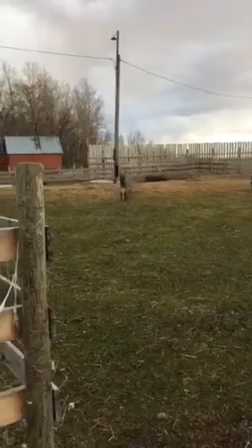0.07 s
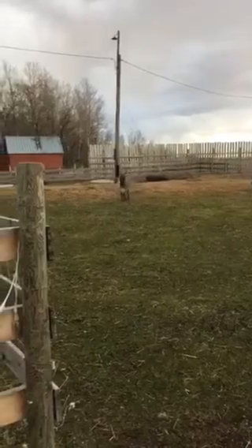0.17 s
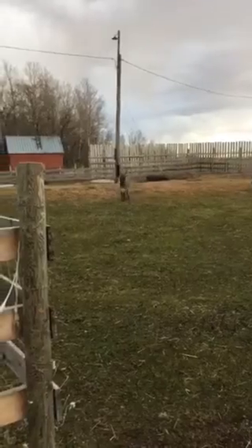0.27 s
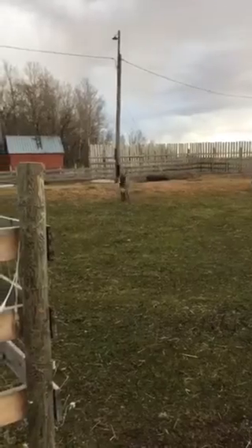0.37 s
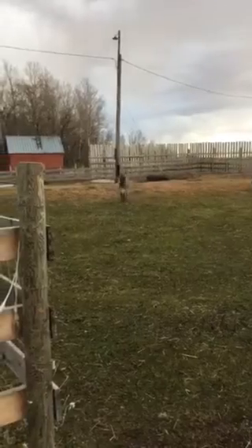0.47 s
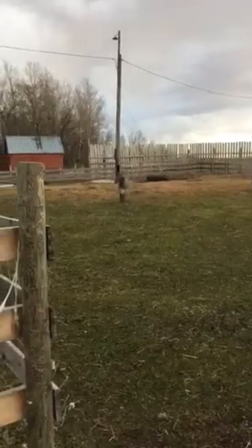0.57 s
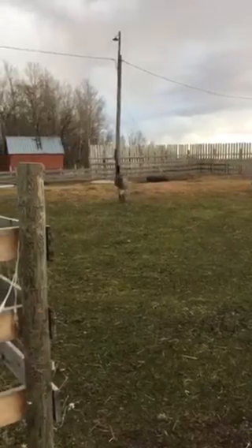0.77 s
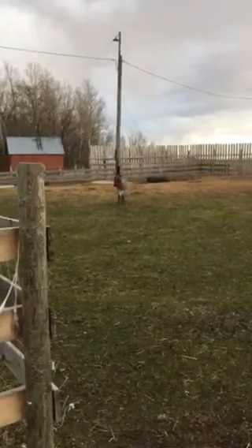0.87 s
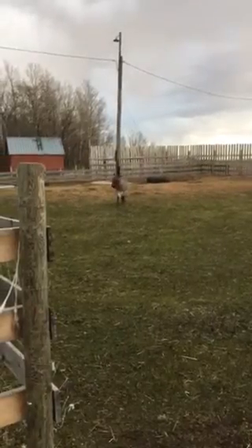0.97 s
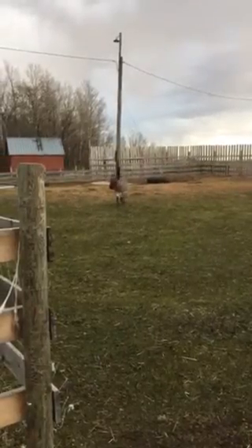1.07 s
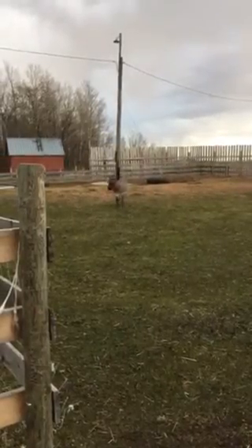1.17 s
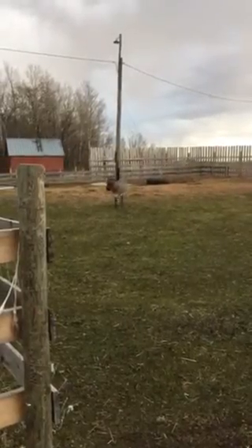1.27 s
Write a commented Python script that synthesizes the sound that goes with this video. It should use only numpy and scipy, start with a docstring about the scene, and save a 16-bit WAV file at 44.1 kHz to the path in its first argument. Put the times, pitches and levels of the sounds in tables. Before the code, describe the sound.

A young donkey brays once across an open pasture. It starts with a soft, closed-mouth hum at 0.1 seconds, breaks into a rough croak at 0.2, then holds a clear, buzzy note from 0.4 to 0.9, growing duller and leaving a faint echo. A bird's soft falling whistle overlaps from 0.5 to 0.9. Very faint, thin chirps recur until about 1.3 seconds over a quiet, distant rumble.

```python
"""A young donkey in a pasture

The donkey brays once: a closed-mouth hum, a jolting croak, then one clear, buzzy held note.
Pulses from its vocal folds ring a throat that dulls as the air runs out; barn and trees echo faintly.
One bird gives a falling whistle, another repeats thin chirps, over a distant rumble and far twitter."""
import sys
import numpy as np
from scipy import signal
from scipy.fft import rfft, irfft
from scipy.io import wavfile
from scipy.ndimage import uniform_filter1d

SR = 44100
rng = np.random.default_rng(int(sys.argv[2]) if len(sys.argv) > 2 else 0)


def put_to_file(sound):
    """Save the sound as 16-bit audio at rate SR, in the file named by the first command-line argument."""
    columns = np.atleast_2d(sound).T  # one column per channel
    safe = np.clip(columns, -1, 1)
    whole_steps = np.round(safe * 32767)
    wavfile.write(sys.argv[1], SR, whole_steps.astype(np.int16))


N = 57330
TIME = np.arange(N) / SR


def gain(db):
    """Turn decibels into a number to multiply by."""
    return 10 ** (np.asarray(db) / 20)


def curve(rows, col=1):
    """One column of a table, joined by straight lines in time."""
    rows = np.array(rows, float)
    return np.interp(TIME, rows[:, 0], rows[:, col])


def unit(x):
    """Scale a sound to an average (rms) strength of 1."""
    return x / np.sqrt(np.mean(x ** 2))


def tone(hz):
    """A pure tone that follows a changing pitch."""
    return np.sin(2 * np.pi * np.cumsum(hz) / SR)


def drift(rate_hz):
    """A smooth random wobble with a typical size near 1."""
    hold = int(SR / rate_hz)
    steps = np.repeat(rng.standard_normal(N // hold + 1), hold)
    return 1.3 * uniform_filter1d(uniform_filter1d(steps, hold), hold)[:N]


def colour(x, points, size=4096):
    """Make each frequency louder or softer, following (f/Hz, level/dB) points."""
    hz, db = np.array(points, float).T
    f = np.maximum(np.arange(size // 2 + 1) * SR / size, 1)
    cepstrum = irfft(np.log(gain(np.interp(np.log(f), np.log(hz), db))))
    # make the filter ring only after a pulse, never before it
    cepstrum[1:size // 2] *= 2
    cepstrum[size // 2 + 1:] = 0
    return signal.fftconvolve(x, irfft(np.exp(rfft(cepstrum))))[:N]


def lowpass(x, hz):
    """Keep what lies below hz, without delaying it."""
    return signal.sosfiltfilt(signal.butter(4, hz, fs=SR, output="sos"), x)


# tone colour of still air: f/Hz, relative level/dB
AIR_COLOUR = [(20, -32.5), (60, 5), (125, -4.5), (300, -19.5), (1700, -22.5), (2900, -26.5), (5000, -31.5),
              (15500, -32)]

def air(level_db=-62):
    """The soft, deep hush of still air."""
    return unit(colour(rng.standard_normal(N), AIR_COLOUR)) * gain(level_db)


# swells of the rumble: t/s, level/dB
RUMBLE_LEVEL = [(.15, -57.5), (.4, -71), (.85, -64), (1.07, -76), (1.28, -54.5)]

def rumble(pitch_hz=60.3, waver_db=4.5):
    """A distant low tone that wavers in pitch and loudness."""
    drone = unit(tone(pitch_hz * (1 + .037 * drift(7.33))))
    return drone * gain(curve(RUMBLE_LEVEL) - waver_db * drift(7.9))


def blurred_band(hz, width_hz=620):
    """A narrow band of noise around hz: birdsong blurred by distance."""
    flutter = lowpass(rng.standard_normal(2 * N), width_hz / 2)[N // 2:N // 2 + N]
    return unit(flutter * np.cos(2 * np.pi * hz * TIME))


def far_birds(call_at_s=1.28, call_width_s=.03):
    """Far-off twitter, with one short, higher call near the end."""
    call = blurred_band(hz=4400) * gain(-70) * np.exp(-((TIME - call_at_s) / call_width_s) ** 2)
    twitter = blurred_band(hz=3270) * gain(-69.5 + 1.2 * drift(25.1))
    return call + twitter


# tone colour of the echo from barn and trees: f/Hz, level/dB
ECHO_COLOUR = [(200, 0), (730, -3), (1700, 8), (2300, 1), (4300, 0), (15000, -12)]
# bounce off the treeline: delay t/s, relative level/dB
TREELINE = [(.21, -8)]

def pasture_echo(calls, chirps, build_s=.0053, fade_60db_s=1):
    """Calls bounce off the treeline and leave a fading wash of echo; thin chirps leave only the wash."""
    envelope = (1 - np.exp(-TIME / build_s)) * gain(-60 * TIME / fade_60db_s)
    tail = unit(rng.standard_normal(N) * envelope) / np.sqrt(N)
    bounce = sum(gain(db) * np.pad(calls, (int(delay * SR), 0))[:N] for delay, db in TREELINE)
    wash = signal.fftconvolve(gain(2) * calls + chirps, tail)[:N]
    return colour(bounce + wash, ECHO_COLOUR)


# one chirp a row: start t/s, top pitch f/Hz, level/dB
CHIRP_NOTES = [(.057, 7850, -77), (.127, 7400, -73), (.78, 7550, -73), (1.0, 7580, -74), (1.11, 7530, -72),
               (1.218, 7480, -70)]

def chirping_bird(length_s=.05, top_s=.037, rise_hz=900, fall_hz=1900):
    """Thin chirps, each rising to a top and hooking down."""
    out = 0
    for start, top_hz, db in CHIRP_NOTES:
        age = np.clip(TIME - start, 0, length_s)
        rising = rise_hz * (1 - age / top_s) ** 3
        falling = fall_hz * ((age - top_s) / (length_s - top_s)) ** 2
        swell = np.sqrt(2 * np.abs(np.sin(np.pi * age / length_s)))
        out = out + gain(db) * swell * tone(top_hz - np.where(age < top_s, rising, falling))
    return out


# path of the whistle: t/s, f/Hz, level/dB
WHISTLE_PATH = [(.485, 6150, -72), (.5, 5900, -59), (.53, 5100, -74), (.575, 4600, -55), (.62, 4400, -60),
                (.66, 4280, -55), (.745, 4130, -54), (.85, 4290, -62), (.885, 4280, -73)]

def whistling_bird(waver=.003):
    """A bird's long, pure whistle that falls and levels out."""
    hz = curve(WHISTLE_PATH) * (1 + waver * drift(149.6))
    sounding = (TIME > WHISTLE_PATH[0][0]) * (TIME < WHISTLE_PATH[-1][0])
    return unit(tone(hz)) * gain(curve(WHISTLE_PATH, 2)) * sounding


# loudness of the hum: t/s, level/dB
HUM_LEVEL = [(.105, -113), (.122, -55.5), (.18, -59.5), (.235, -49), (.26, -75)]

def hum(cycles):
    """With the donkey's mouth shut, only the lowest tone of its voice gets out."""
    sounding = (TIME > HUM_LEVEL[0][0]) * (TIME < HUM_LEVEL[-1][0])
    return unit(np.sin(2 * np.pi * cycles)) * gain(curve(HUM_LEVEL)) * sounding


# jolts of the croak: t/s, added level/dB
CROAK_JOLTS = [(.211, 11), (.229, 13), (.292, 6), (.31, 5), (.333, 7), (.351, 4), (.368, 3)]

def croak(cycles, jolt_s=.009):
    """Each jolt throws the vocal folds open: their cycle restarts with a hard pulse and a weaker one."""
    times = np.array(CROAK_JOLTS)[:, 0]
    # shift the cycle count so that a pulse lands on every jolt
    slip = np.unwrap(-2 * np.pi * np.interp(times, TIME, cycles)) / (2 * np.pi)
    shifted = cycles + np.interp(TIME, times, slip - np.floor(slip[0]))
    boost_db = sum(db * (TIME > at - .001) * np.exp(-((TIME - at) / jolt_s) ** 2)
                   for at, db in CROAK_JOLTS)
    return shifted, gain(boost_db)


# hoarseness of the voice: t/s, roughness/0-1
ROUGHNESS = [(.3, .85), (.378, .58), (.41, .2), (.8, .15), (.86, .32), (.91, .5)]

def vocal_folds(cycles, jitter_s=.00019, shimmer_db=1.5, half_width=8):
    """One sharp pulse a cycle; roughness upsets timing and strength and adds a rasp of air."""
    rough = curve(ROUGHNESS)
    at = np.interp(np.arange(1, int(cycles[-1]) - 1), cycles, np.arange(N))
    pulse_rough = rough[at.astype(int)]
    timing_luck, strength_luck = rng.standard_normal((len(at), 2)).T
    at = np.clip(at + pulse_rough ** 2 * jitter_s * SR * timing_luck, half_width, N - half_width - 2)
    strength = gain(shimmer_db * pulse_rough * strength_luck)
    # draw each pulse as a tiny ripple, so it can fall between two samples
    samples = at.astype(int)[:, None] + np.arange(-half_width, half_width + 1)
    offset = samples - at[:, None]
    shape = np.sinc(offset) * np.cos(np.pi * offset / (2 * half_width + 2)) ** 2
    pulses = np.bincount(samples.ravel(), (shape * strength[:, None]).ravel(), N)
    rasp = rng.standard_normal(N) * np.exp(-(cycles % 1) / .35)  # a puff of air each cycle
    return unit(pulses) + .8 * rough ** 2 * unit(rasp), rough


# ring of the throat with the mouth wide open: f/Hz, relative level/dB
MOUTH_WIDE = [(40, -57), (175, -15.5), (540, -21), (715, -1), (900, -24), (1260, -27.5), (1800, -18.5),
              (1990, -23.5), (2150, -37), (2330, -18), (2690, -4.5), (3060, -29.5), (3600, -18),
              (4500, -33.5), (5650, -38), (6500, -32.5), (8100, -38.5), (10000, -60), (16000, -63)]
# with the mouth half closed: f/Hz, relative level/dB
MOUTH_NARROW = [(40, -22.5), (185, -11.5), (370, -21), (560, -22), (740, -2), (930, -19.5), (1120, -33),
                (1300, -27), (1680, -20), (2080, -21.5), (2430, -15.5), (2620, -4.5), (3400, -24.5),
                (4100, -21), (5200, -46.5), (6900, -27), (7400, -32), (7800, -24.5), (8900, -37.5),
                (9800, -55), (12200, -35), (16000, -95)]
# extra ring while the voice rasps: f/Hz, relative level/dB
RASP_COLOUR = [(2600, -58.5), (3130, -2), (3400, -22.5), (3850, -14.5), (6000, -57.5)]

def throat(pulses, rough, opens_s=.219, opening_takes_s=.027, closes_s=.61, closing_takes_s=.3):
    """The pulses ring the throat, through a mouth that opens fast and slowly half closes."""
    opened = np.clip(.5 + (TIME - opens_s) / opening_takes_s, 0, 1)
    closed = np.clip(.5 + (TIME - closes_s) / closing_takes_s, 0, 1)
    parting = colour(pulses, [(hz * .86, db) for hz, db in MOUTH_WIDE])  # rings lower as the lips part
    wide = colour(pulses, MOUTH_WIDE) + rough * colour(pulses, RASP_COLOUR)
    narrow = colour(pulses, MOUTH_NARROW)
    return (1 - opened) * parting + (opened - closed) * wide + closed * narrow


# a gap in the voice's tone colour: t/s, f/Hz, depth/0-1
NOTCH_PATH = [(.56, 2150, 0), (.68, 2590, .8), (.73, 2800, .7), (.79, 3250, 0)]

def rising_notch(x, width_hz=220):
    """A narrow gap climbs through the voice's nasal ring, shifting its tone colour."""
    spin = np.exp(2j * np.pi * np.cumsum(curve(NOTCH_PATH)) / SR)
    pole = np.exp(-np.pi * width_hz / SR)
    # slide the band down to 0 Hz, pick it out, slide it back
    band = 2 * np.real(signal.lfilter([1 - pole], [1, -pole], x / spin) * spin)
    return x - curve(NOTCH_PATH, 2) * band


def ground_smear(x, spread_s=.0008):
    """Uneven ground spreads each pulse out a little in time; the tone colour stays."""
    f = np.arange(N + 1) * SR / (2 * N)
    delay = spread_s * np.sin(np.pi * f / 3600) ** 2
    return irfft(rfft(x, 2 * N) * np.exp(-2j * np.pi * np.cumsum(delay) * f[1]))[:N]


def fence_scatter(x, fade_s=.003, level_db=-2, size=512):
    """Fences and grass return the treble within a few milliseconds, making its overtones uneven."""
    tail = rng.standard_normal(size) * np.exp(-TIME[:size] / fade_s)
    return x + gain(level_db) * signal.fftconvolve(x, tail / np.linalg.norm(tail))[:N]


# pitch of the voice: t/s, f/Hz
BRAY_PITCH = [(.11, 172), (.15, 163), (.26, 162), (.335, 173), (.37, 177.2), (.55, 181.5), (.6, 182.8),
              (.65, 185.2), (.7, 186.5), (.8, 187.3), (.864, 184), (.905, 179)]
# volume controls of the bray: t/s, chest level/dB, nasal ring level/dB, treble level/dB
BRAY_LEVELS = [(.18, -68, -81, -100), (.205, -52.5, -51.5, -65.5), (.24, -54.5, -60.5, -72.5),
               (.255, -47, -58, -61), (.28, -44, -50, -63.5), (.345, -43.5, -50, -59),
               (.39, -38, -42.5, -52), (.45, -39, -46, -52), (.55, -38.5, -47.5, -60),
               (.66, -39, -46.5, -61.5), (.82, -44, -52.5, -71.5), (.907, -45.5, -58, -72)]

def donkey(chest_top_hz=1640, nasal_top_hz=4240, release_db_per_s=897.5):
    """Hum, croak and held note on one pitch line; low, middle and high bands each swell and fade."""
    cycles, force = croak(np.cumsum(curve(BRAY_PITCH)) / SR)
    pulses, rough = vocal_folds(cycles)
    voice = ground_smear(throat(pulses * force * (TIME > BRAY_LEVELS[0][0]), rough))
    chest = lowpass(voice, chest_top_hz)
    below_treble = lowpass(voice, nasal_top_hz)
    nasal = rising_notch(below_treble - chest)
    treble = fence_scatter(voice - below_treble)
    clear = rough < .5  # the held note sets each band's scale
    bray = sum(band / np.std(band[clear]) * gain(curve(BRAY_LEVELS, col))
               for col, band in enumerate([chest, nasal, treble], 1))
    release = gain(-release_db_per_s * np.maximum(TIME - BRAY_LEVELS[-1][0], 0))
    return hum(cycles) + bray * release


def scene():
    """The donkey and two birds with their echo, over the quiet background."""
    bray, whistle, chirps = donkey(), whistling_bird(), chirping_bird()
    echo = pasture_echo(gain(-18) * bray + gain(-6) * whistle, gain(-3) * chirps)
    return (air() + rumble() + far_birds() + echo + chirps + whistle + bray)[None]


def record(dry, top_hz=15800):
    """A steep filter cuts off the very highest treble."""
    return signal.sosfilt(signal.ellip(10, .2, 70, top_hz, fs=SR, output="sos"), dry)


dry = scene()
out = record(dry)
put_to_file(out)
```